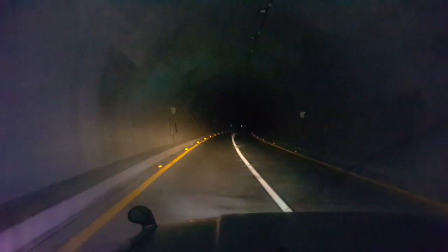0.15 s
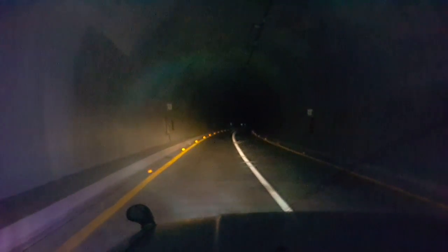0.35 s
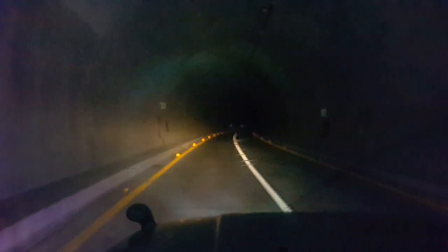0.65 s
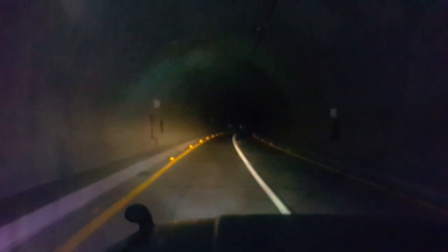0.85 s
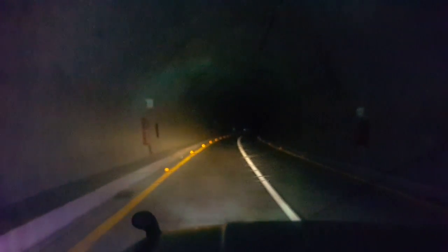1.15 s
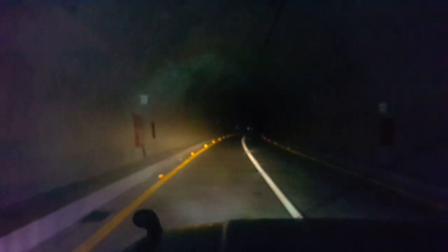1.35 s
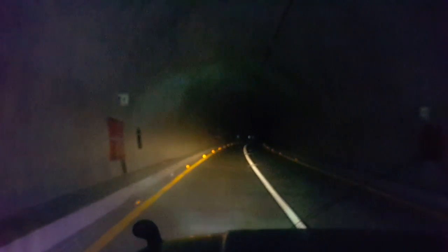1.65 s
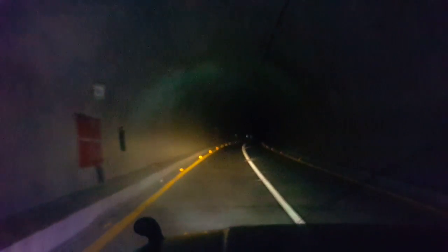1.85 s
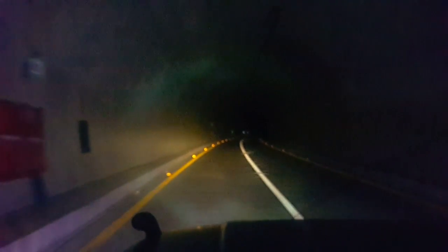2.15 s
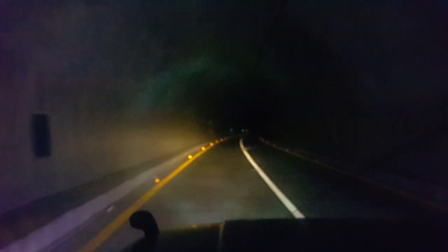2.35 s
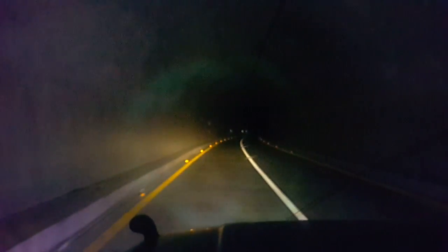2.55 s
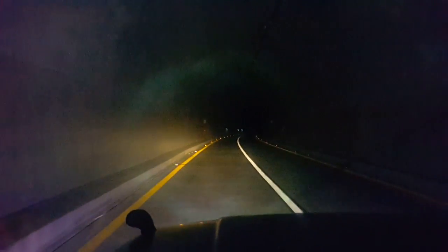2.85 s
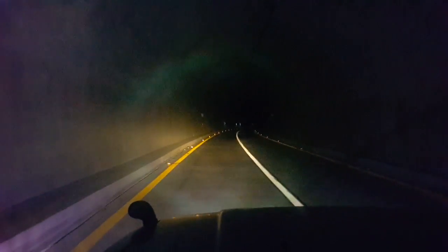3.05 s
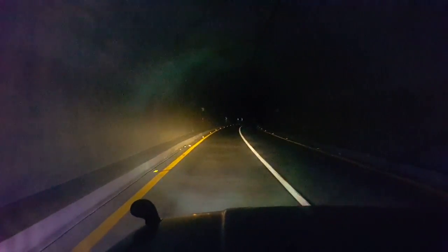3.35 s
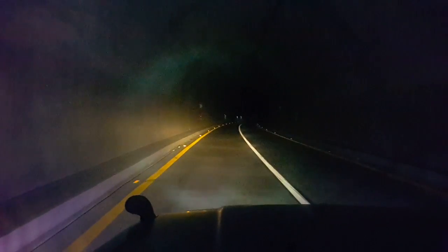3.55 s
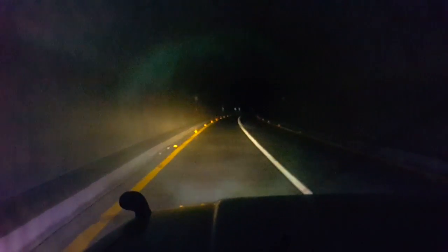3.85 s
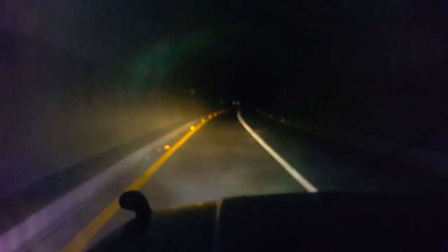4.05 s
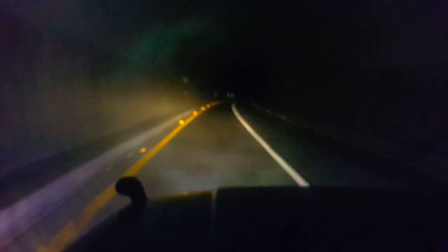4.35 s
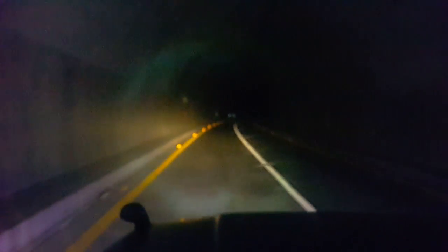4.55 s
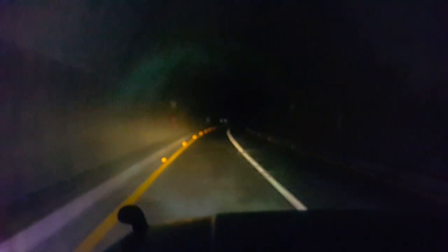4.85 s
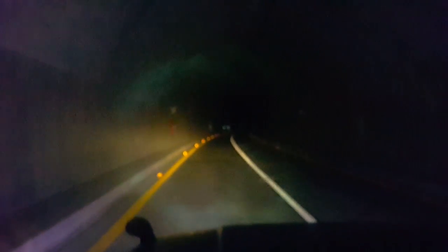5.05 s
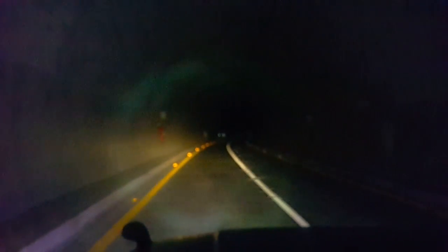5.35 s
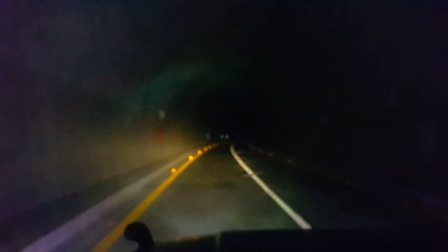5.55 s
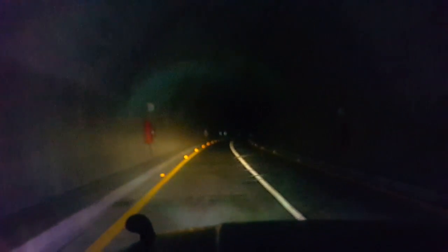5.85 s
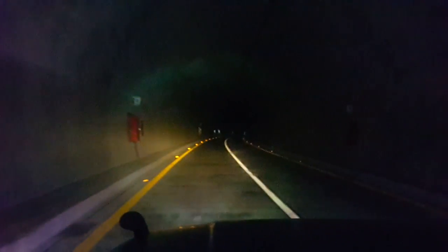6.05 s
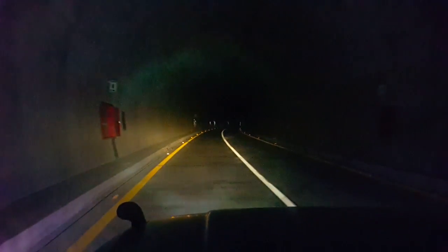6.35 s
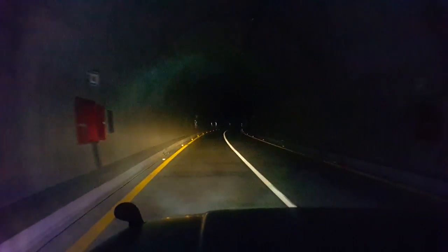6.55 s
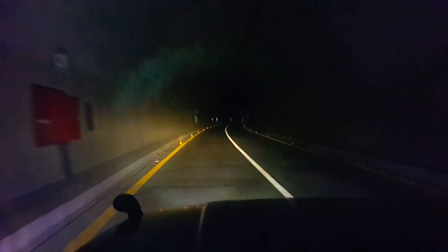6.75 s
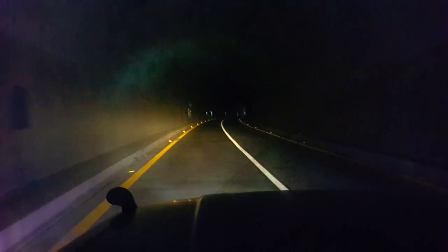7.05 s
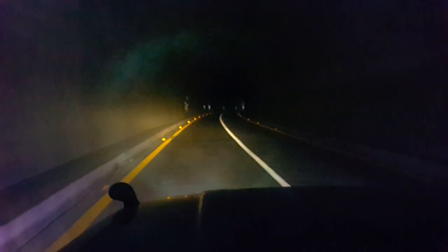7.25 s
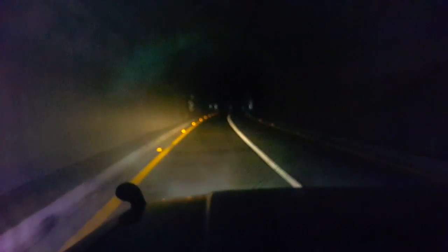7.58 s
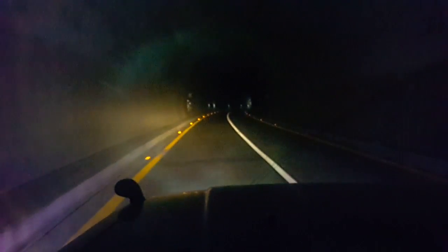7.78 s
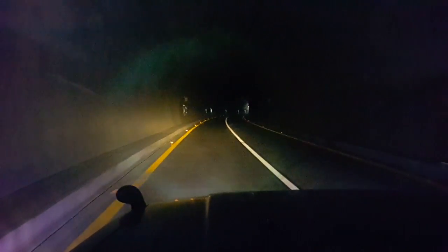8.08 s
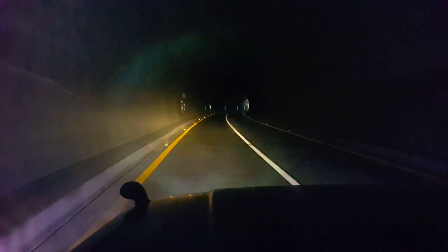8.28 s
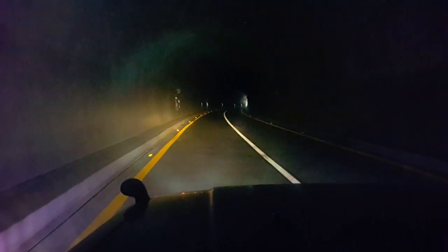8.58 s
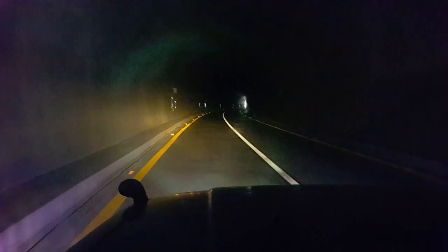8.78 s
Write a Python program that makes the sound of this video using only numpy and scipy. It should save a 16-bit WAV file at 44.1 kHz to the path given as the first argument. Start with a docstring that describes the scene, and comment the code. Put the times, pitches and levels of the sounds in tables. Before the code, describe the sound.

Heard from inside a moving car in a tunnel, close stereo microphone in the cabin. A deep engine boom with roar and hiss climbs slowly, falls in pitch through an upshift around three to four seconds, flares once, then climbs gently in the higher gear. Tyre rumble and air rush continue throughout; faint trim ticks, a tiny squeak and a double knock later.

```python
"""The engine of a car, heard from inside the cabin. Two sine tones make its boom, which climbs, falls back
through an upshift at about three seconds, then takes up the load again in the higher gear.
Weaker sine lines ride along, and shaped noise makes the engine bay's roar and hiss, the tyres' rumble
and the rush of air. Loose trim ticks and rustles in bursts of noise; there is a squeak, a gliding tone,
and two knocks, made of noise and ringing.
"""
import sys
import numpy as np
from scipy import signal
from scipy.fft import rfft, irfft
from scipy.io import wavfile

SR = 44100
rng = np.random.default_rng(int(sys.argv[2]) if len(sys.argv) > 2 else 0)


def wrap_up_sound(samples):
    """Save the sound to the file named by the first command line argument, as 16-bit audio."""
    columns = np.atleast_2d(samples).T
    # keep every value between -1 and 1, then stretch to whole-number steps
    tamed = np.clip(columns, -1, 1)
    steps = np.round(tamed * 32767).astype(np.int16)
    wavfile.write(sys.argv[1], SR, steps)


N = 393372
TIME = np.arange(N) / SR  # s
FREQS = np.maximum(np.fft.rfftfreq(N, 1 / SR), 1)  # Hz, kept above 0 so it can be divided by


def from_db(db):
    """Turn decibels into a gain."""
    return 10 ** (np.asarray(db) / 20)


def rms_one(x):
    """Scale a sound to an rms of 1."""
    return x / np.sqrt(np.mean(x ** 2) + 1e-20)


def in_time(rows):
    """Read each column of a time table at every sample."""
    s, *columns = np.transpose(rows)
    return [np.interp(TIME, s, column) for column in columns]


def at_hz(points):
    """Read a frequency table at every frequency, on a log axis."""
    hz, value = np.transpose(points)
    return np.interp(np.log(FREQS), np.log(hz), value)


def drift(rate_hz):
    """Random wandering of spread 1: noise with everything much faster than `rate_hz` taken out."""
    spectrum = rfft(rng.standard_normal(N))
    return rms_one(irfft(spectrum / (1 + (FREQS / rate_hz) ** 4), N))


def swell(centre_s, length_s, order=4):
    """A flat-topped bump in time; a higher order gives steeper sides."""
    return 1 / (1 + np.abs(2 * (TIME - centre_s) / length_s) ** order)


SHIFT_START_S, SHIFT_END_S = 2.9, 4.6


def shifted(low_gear, high_gear, start_s=SHIFT_START_S, end_s=SHIFT_END_S):
    """Slide a value from its low-gear to its high-gear setting around the upshift."""
    return np.interp(TIME, [start_s, end_s], [low_gear, high_gear])


# How alike left and right are; values outside 0 to 1 are clipped: f/Hz, likeness (no unit)
LEFT_RIGHT_LIKENESS = [(40, 2), (80, 3.5), (320, 2), (420, 0.28), (700, 0.47), (1300, .5), (2400, 0.39),
                       (3500, 0), (12000, 0.08)]


def cabin_noise(spectrum):
    """Stereo noise of a given colour: alike left and right in the bass, diffuse in the treble."""
    mid, side = rfft(rng.standard_normal((2, N)))
    alike = np.clip(at_hz(LEFT_RIGHT_LIKENESS), 0, 1)
    pair = np.sqrt(1 + alike) * mid + np.sqrt(1 - alike) * side * [[1], [-1]]
    top_hz = spectrum[-1][0]
    fade_above = 1 / (1 + (FREQS / (2 * top_hz)) ** 4)
    return rms_one(irfft(pair * from_db(at_hz(spectrum)) * fade_above, N))


# Air resonances that an engine tone sets booming: f/Hz, width/Hz, level at its centre/dB
BOOM_RESONANCES = [(70.4, 29, -17), (104.9, 22.8, -11), (155.3, 44.3, -13.5)]


def boom_gain(hz):
    """How strongly the cabin air answers an engine tone of this pitch."""
    power = 0
    for centre_hz, width_hz, db in BOOM_RESONANCES:
        power = power + (from_db(db) / (1 + (2 * (hz - centre_hz) / width_hz) ** 2)) ** 2
    return np.sqrt(power)


# Brief dips and swells of the two tones: t/s, length/s, lower tone level/dB, upper tone level/dB
TONE_SWAYS = [(1.39, .2, 1.3, -5), (1.963, 0.074, -8, 1), (3.032, .1, -4, -0.5), (3.908, .4, -.5, -13.5),
              (4.299, 0.24, 2, 2.5), (4.473, 0.041, -8, -2.5), (4.854, 0.074, -10, 0),
              (5.352, .14, -10, -2.5), (6.5, .5, 3, 0), (7.013, .21, -11, 2), (7.525, 0.17, -5, 0.5),
              (8.45, .45, 2, 0)]
# After the shift the boom stays softer for a while
LULL_S, LULL_LENGTH_S, LULL_DB = 5.09, 1.67, -4.5


def boom(firing_hz, phase, flutter=0.054, lull_waver_db=2.5):
    """Exhaust pulses become two nearly pure tones that swell in cabin resonances and waver in the lull."""
    lull = swell(LULL_S, LULL_LENGTH_S, order=12)
    out = np.zeros(N)
    for multiple in (1, 2):
        sway_db = sum(tones_db[multiple - 1] * swell(s, length) for s, length, *tones_db in TONE_SWAYS)
        level_db = sway_db + lull * (LULL_DB + lull_waver_db * drift(11))
        gain = boom_gain(multiple * firing_hz) * from_db(level_db)
        out += gain * (1 + flutter * drift(6.5)) * np.sin(multiple * phase)
    return np.sqrt(2) * out  # a sine of rms 1 peaks at root 2


# Weaker lines from uneven cylinders, belt drives and, for the lowest, turning wheels or shafts,
# before the common trim: multiple of the firing rate (no unit), low-gear level/dB, high-gear level/dB
WEAKER_LINES = [(.69, -32, -44), (1.5, -29, -39), (1.655, -25, -42), (2.25, -39, -44), (2.5, -34, -42),
                (2.765, -33, -33), (3, -41, -35), (3.5, -39, -38), (3.865, -33, -32), (4, -44, -45),
                (5, -48, -45), (5.5, -52, -46), (6, -54, -48), (7.74, -48, -56)]


def side_orders(phase, rough=0.29, wander_rad=0.67, trim_db=-1.0):
    """Weaker, unsteady lines at multiples of the firing rate; their mix changes with the gear."""
    out = np.zeros(N)
    for multiple, low_db, high_db in WEAKER_LINES:
        gain = from_db(shifted(low_db, high_db)) * (1 + rough * drift(6.1))
        start = 2 * np.pi * rng.random()
        out += gain * np.sin(multiple * phase + wander_rad * drift(3.6) + start)
    return np.sqrt(2) * from_db(trim_db) * out


# Rise and fall of the hiss, mostly with engine load, with a brief swish at 2 s;
# only the change around the average counts: t/s, level before each part's own factor/dB
HISS_RISE_AND_FALL = [(0.1, -38), (0.54, -38.5), (1.27, -38), (1.76, -39), (1.98, -35.5), (2.12, -38),
                      (2.8, -36), (3.66, -43.5), (4.34, -43), (4.58, -39.5), (5.58, -36.5), (6.44, -39),
                      (7.46, -38), (8.85, -38)]
# Colour of the combustion roar: f/Hz, relative level per Hz/dB
ROAR_COLOUR = [(100, -18), (170, 4), (240, -6), (390, -2), (470, -5.5), (550, -9.5), (720, -4), (900, -10),
               (1150, -10.5), (1350, -12.5), (2500, -33)]
# Colour of the intake hiss: f/Hz, relative level per Hz/dB
HISS_COLOUR = [(700, -2), (1100, -3), (1330, -1.5), (1550, 1), (1750, 2.5), (2050, -0.5), (2450, -1.5),
               (3000, -7.5), (3700, -17), (4800, -23), (5800, -15.5), (6900, -33.5), (9000, -46)]
# Colour of the fine treble over the hiss: f/Hz, relative level per Hz/dB
TREBLE_COLOUR = [(3000, -16.5), (6000, -5), (7700, -2.5), (9000, -5.5), (10500, -6.5), (13000, -14),
                 (15700, -14.5)]
# The roar sinks as the revs drop
ROAR_LOW_GEAR_DB, ROAR_HIGH_GEAR_DB = -25, -30
ROAR_SINKS_FROM_S, ROAR_SINKS_TO_S = 3.3, 3.62
# How far each part follows that rise and fall, in dB per dB
ROAR_FOLLOWS, ROAR_TOP_FOLLOWS, HISS_FOLLOWS, TREBLE_FOLLOWS = 0.32, 1, 1.6, 1.1
HISS_DB, TREBLE_LOW_GEAR_DB, TREBLE_HIGH_GEAR_DB = -36, -62.5, -60
# The whole engine bay flares briefly just before the shift
FLARE_S, FLARE_LENGTH_S, FLARE_DB = 2.7, .36, 1


def engine_bay(phase, throb=0.043, roar_uneven_db=0.95, hiss_uneven_db=0.6, bright_from_hz=850):
    """Combustion roar and intake hiss rise and fall together and throb at each firing; low roar is dull."""
    level_db, = in_time(HISS_RISE_AND_FALL)
    change_db = level_db - level_db.mean() + hiss_uneven_db * drift(21)

    noise = cabin_noise(ROAR_COLOUR)
    body = irfft(rfft(noise) / (1 + (FREQS / bright_from_hz) ** 8), N)
    top = noise - body
    roar = body * from_db(ROAR_FOLLOWS * change_db) + top * from_db(ROAR_TOP_FOLLOWS * change_db)
    roar_db = shifted(ROAR_LOW_GEAR_DB, ROAR_HIGH_GEAR_DB, ROAR_SINKS_FROM_S, ROAR_SINKS_TO_S)
    roar = roar * from_db(roar_db + roar_uneven_db * drift(9.4))

    hiss = from_db(HISS_DB + HISS_FOLLOWS * change_db) * cabin_noise(HISS_COLOUR)
    treble_db = shifted(TREBLE_LOW_GEAR_DB, TREBLE_HIGH_GEAR_DB) + TREBLE_FOLLOWS * change_db
    treble = from_db(treble_db) * cabin_noise(TREBLE_COLOUR)

    flare = from_db(FLARE_DB * swell(FLARE_S, FLARE_LENGTH_S))
    return (roar + hiss + treble) * flare * (1 + throb * np.cos(phase))


# Loudness of the tyre rumble: t/s, level/dB
RUMBLE_LEVEL = [(0, -18.5), (2.6, -18), (3.2, -17.5), (4, -19), (5, -19.5), (5.7, -19), (6.5, -22),
                (8.92, -21.5)]
# Colour of the tyre rumble: f/Hz, relative level per Hz/dB
RUMBLE_COLOUR = [(20, -28), (32, -20), (44, -10), (55, -17.5), (72, -7), (110, -6), (140, -4.5), (170, 0),
                 (200, -3), (230, -12.5), (280, -14), (350, -17), (600, -22.5), (1500, -36.5)]


def tyres(uneven_db=0.5):
    """Road texture shakes the body, whose panels ring most strongly below about 200 Hz."""
    rumble_db, = in_time(RUMBLE_LEVEL)
    return from_db(rumble_db + uneven_db * drift(33)) * cabin_noise(RUMBLE_COLOUR)


# Colour of the air rushing past the body: f/Hz, relative level per Hz/dB
RUSH_COLOUR = [(500, -6.5), (900, 1), (1080, -16.5), (1350, 0), (2000, -5), (3500, -21.5), (5000, -22),
               (8000, -37.5), (12000, -38.5), (15700, -40)]


def air_rush(level_db=-41):
    """Air rushing past the body makes a steady noise above the rumble."""
    return from_db(level_db) * cabin_noise(RUSH_COLOUR)


def buzz(age, hz, width, t60):
    """A short dying stereo buzz: noise passed twice through one plastic resonance for steep sides."""
    resonance = signal.iirpeak(min(hz, SR / 3), 1 / min(width, 1), fs=SR)
    noise = rng.standard_normal((2, len(age)))
    ringing = signal.lfilter(*resonance, signal.lfilter(*resonance, noise))
    return rms_one(ringing) * from_db(-60 * age / t60)


# Touches of loose trim: t/s, starting level before the common trim/dB, f/Hz,
# time to die by 60 dB/s, width as a share of the pitch (no unit); pitch and width are capped in buzz
TRIM_TOUCHES = [(.198, -55, 12000, .04, .23), (1.202, -56, 10000, .04, .3), (3.512, -53, 11100, .08, 0.34),
                (3.983, -42, 8000, 0.043, .9), (4.03, -37, 5000, .04, .7), (5.10, -46, 10000, .04, .4),
                (6.58, -52, 9000, .04, .4)]


def trim_ticks(trim_db=-4.5):
    """Each touch of loose trim buzzes for a moment."""
    out, age = np.zeros((2, N)), TIME[:SR // 4]
    for s, start_db, hz, t60, width in TRIM_TOUCHES:
        at = round(s * SR)
        out[:, at:at + len(age)] += from_db(start_db + trim_db) * buzz(age, hz, width, t60)
    return out


# Brief rustles: t/s, length/s, level before the grain/dB, brightness/dB per octave
RUSTLE_MOMENTS = [(2.017, .085, -51, 6), (3.535, 0.054, -50.5, 2), (4.6, 0.15, -45, -0.5),
                  (8.6, 0.26, -51.5, -2)]
# Their shared colour before each one's brightness is added: f/Hz, relative level per Hz/dB
RUSTLE_SPECTRUM = [(2800, -5), (4200, 11.5), (5200, 7), (6200, 7.5), (7200, -2.5), (8400, -3), (11000, -3),
                   (15500, -14.5)]


def rustles(grain_db=2.5, pivot_hz=6000):
    """Something light slides for a moment: a grainy swell of treble, each with its own brightness."""
    out = 0
    for s, length, db, tilt_db in RUSTLE_MOMENTS:
        colour = [(hz, level + tilt_db * np.log2(hz / pivot_hz)) for hz, level in RUSTLE_SPECTRUM]
        out = out + from_db(db) * swell(s, length, order=6) * cabin_noise(colour)
    return out * from_db(grain_db * drift(150))


SQUEAK_S, SQUEAK_LENGTH_S, SQUEAK_HZ, SQUEAK_DB = 3.815, .07, 4220, -49


def squeak(waver=.003, fall_per_s=0.12):
    """A faint, thin, wavering tone that sinks a little, with the load off during the shift."""
    glide = np.exp(-fall_per_s * (TIME - SQUEAK_S))
    phase = 2 * np.pi * np.cumsum(SQUEAK_HZ * glide * (1 + waver * drift(25))) / SR
    return np.sqrt(2) * from_db(SQUEAK_DB) * swell(SQUEAK_S, SQUEAK_LENGTH_S) * np.sin(phase)


# A small loose part knocks twice; the level scales the whole hit: t/s, level/dB
KNOCK_MOMENTS = [(7.314, -37), (7.358, -35)]
# What it rings with, before random unevenness: f/Hz, level within the hit/dB, time to die by 60 dB/s
KNOCK_RINGS = [(3560, 0, 0.11), (4150, -4, .07), (5700, -10, .12)]


def knocks(uneven_db=2.0, chatter_db=-1.5, chatter_hz=3850, chatter_width=.33, chatter_t60=.13):
    """Each knock chatters and sets the same few modes ringing, a little differently left and right."""
    out, age = np.zeros((2, N)), TIME[:SR // 4]
    for s, knock_db in KNOCK_MOMENTS:
        hit = from_db(chatter_db) * buzz(age, chatter_hz, chatter_width, chatter_t60)
        for hz, db, t60 in KNOCK_RINGS:
            gain = from_db(db + uneven_db * rng.standard_normal((2, 1)) - 60 * age / t60)
            hit = hit + gain * np.sin(2 * np.pi * (hz * age + rng.random((2, 1))))
        at = round(s * SR)
        out[:, at:at + len(age)] += from_db(knock_db) * hit
    return out


# Standing waves of the cabin, peaks and nulls: f/Hz, width/Hz, level/dB
STANDING_WAVES = [(288, 22, 3.5), (307.7, 11, -3), (362.6, 9.4, 5), (387, 10, -0.5), (430, 15, -4),
                  (448, 53, 5), (1034, 24, 0.5), (1348, 62, -7.5), (1897, 50, 5.5), (1930, 69, -6.5)]


def cabin(x, echo_db=-23, echo_from_hz=600, count=8):
    """Standing waves colour the sound, and short echoes off the glass ripple the treble."""
    modes_db = sum(db / (1 + (2 * (FREQS - hz) / width) ** 2) for hz, width, db in STANDING_WAVES)
    echoes = np.zeros((2, N))
    for side in echoes:
        delays_s = rng.uniform(.003, .018, count)
        side[(delays_s * SR).astype(int)] = from_db(echo_db)
    glass = 1 + rfft(echoes) / (1 + (echo_from_hz / FREQS) ** 2)
    return irfft(rfft(x) * from_db(modes_db) * glass, N)


# Balance of the two microphone ports: f/Hz, left minus right level/dB
PORT_BALANCE = [(35, 6.5), (65, 4.3), (150, 1.34), (210, 3.5), (280, 9), (380, 2.5), (520, 2), (1300, 0),
                (1760, 1), (2400, 6.5), (2900, 6.5), (3800, 0.5), (6700, -1.5), (8100, 7), (12000, 1.5)]
PORT_LAG_S, LAG_FROM_HZ = 0.000403, 300


def ports(x):
    """Two ports colour the sound differently; treble reaches the left first, deep bass is in step."""
    half_db = at_hz(PORT_BALANCE) / 2
    lag_s = PORT_LAG_S / (1 + (LAG_FROM_HZ / FREQS) ** 2)
    late = np.exp(-2j * np.pi * FREQS * lag_s)
    left_right = np.array([from_db(half_db), from_db(-half_db) * late])
    return irfft(rfft(x) * left_right, N)


# Engine speed climbs, drops in the upshift, flares once and climbs again: t/s, firing rate f/Hz
ENGINE_SPEED = [(0, 98.7), (1.4, 103), (2.6, 111.2), (2.8, 106.6), (3, 96.5), (3.45, 77.3), (3.9, 61.3),
                (4.3, 71.4), (4.6, 66.4), (6, 70.9), (8.92, 78.7)]


def scene():
    """Engine, tyres, air and trim, all heard in the cabin."""
    firing_hz, = in_time(ENGINE_SPEED)
    phase = 2 * np.pi * np.cumsum(firing_hz) / SR
    engine = boom(firing_hz, phase) + side_orders(phase) + engine_bay(phase)
    loose_parts = trim_ticks() + rustles() + squeak() + knocks()
    soft_ends = signal.windows.tukey(N, .001)
    return ports(cabin(soft_ends * (engine + tyres() + air_rush() + loose_parts)))


def record(dry, cutoff_hz=15750):
    """Round off the highest peaks, then cut the top steeply."""
    rounded = dry / (1 + dry ** 8) ** (1 / 8)
    steep_cut = signal.ellip(12, .1, 90, cutoff_hz, fs=SR, output="sos")
    return signal.sosfilt(steep_cut, rounded)


dry = scene()
out = record(dry)
wrap_up_sound(out)
```